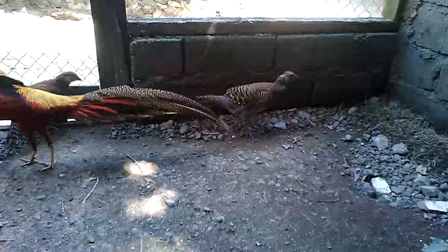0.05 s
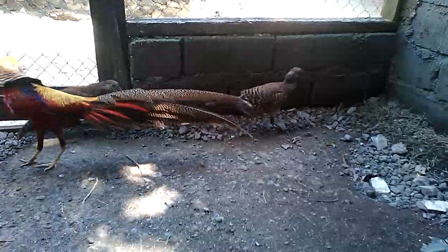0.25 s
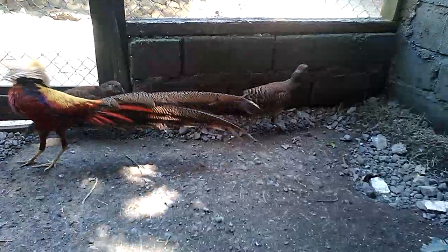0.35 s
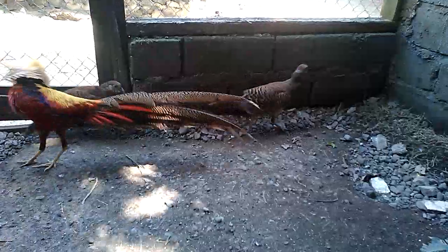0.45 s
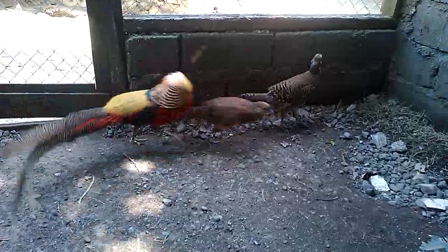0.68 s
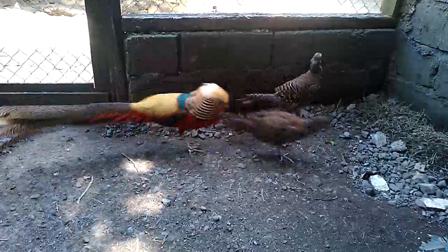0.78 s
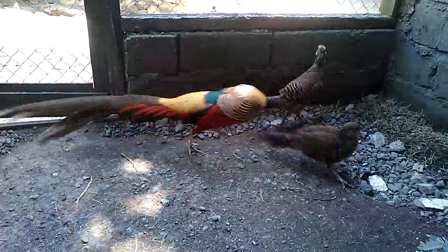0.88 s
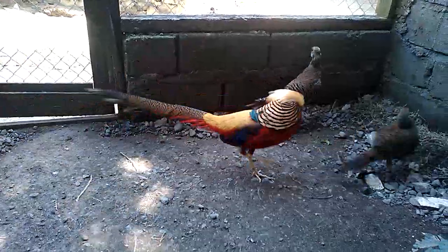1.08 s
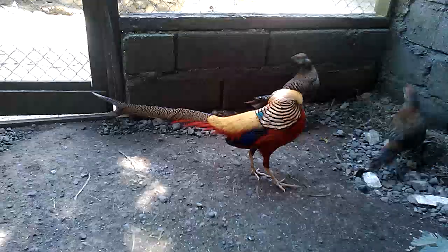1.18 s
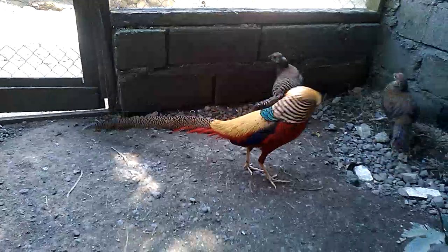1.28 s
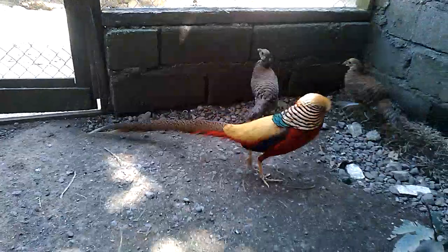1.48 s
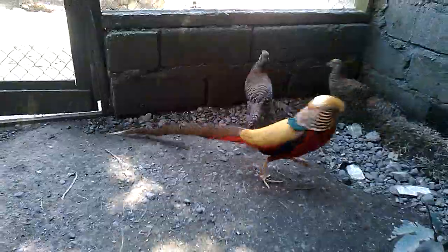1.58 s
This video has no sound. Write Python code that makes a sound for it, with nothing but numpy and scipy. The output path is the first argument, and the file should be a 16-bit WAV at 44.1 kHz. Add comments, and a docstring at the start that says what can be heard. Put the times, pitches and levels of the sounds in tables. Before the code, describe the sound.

A pheasant lets out one long hiss that swells and fades. Feet then scrape over grit and pebbles, and hens give a short falling whine and a few dry clucks, over a faint outdoor hush in a walled pen.

```python
"""A golden pheasant hissing in its pen

The bird gives one long swelling hiss, turbulent air ringing in its throat and beak, then darts over
the grit, its feet scraping, thudding and knocking pebbles together. The hens answer with a falling
whine, soft notes and a few dry clucks, single pulses that ring in the throat. The block walls add
a short dull tail; a steady outdoor hush and a low rumble lie beneath."""
import sys
import numpy as np
from scipy import signal
from scipy.fft import rfft, irfft, next_fast_len
from scipy.io import wavfile
from scipy.ndimage import uniform_filter1d

SR = 44100
rng = np.random.default_rng(int(sys.argv[2]) if len(sys.argv) > 2 else 0)


def log_audio(samples):
    """Write samples as a 16-bit WAV file to the path given in sys.argv[1]."""
    # one column per channel
    frames = np.atleast_2d(samples).T
    # limit to full scale, then quantise
    limited = np.clip(frames, -1, 1)
    pcm = np.round(limited * 32767).astype(np.int16)
    wavfile.write(sys.argv[1], SR, pcm)


N = 72765
TIME = np.arange(N) / SR


def from_db(db):
    """Amplitude ratio of a level in decibels."""
    return 10 ** (np.asarray(db) / 20)


def rms_one(x):
    """Normalisation to unit mean square."""
    return x / np.sqrt(np.mean(x ** 2) + 1e-20)


def in_time(rows):
    """Linear interpolation of each column over the times in the first."""
    times, *columns = np.transpose(rows)
    return [np.interp(TIME, times, column) for column in columns]


def sounding(rows):
    """A gate over the span of a curve, with 5 ms fades."""
    return np.clip(np.minimum(TIME - rows[0][0], rows[-1][0] - TIME) * 200, 0, 1)


def swell(start, attack, hold, release, db=0):
    """A trapezoidal envelope whose plateau lies at the given level."""
    return from_db(db) * np.interp(TIME, np.cumsum([start, attack, hold, release]), [0, 1, 1, 0])


def shaped(x, colour):
    """Zero-phase filtering by a curve of (f/Hz, gain/dB) points."""
    hz, db = np.transpose(colour)
    size = next_fast_len(N + SR // 10)
    f = np.maximum(np.arange(size // 2 + 1) * SR / size, 1)
    gain = from_db(np.interp(np.log(f), np.log(hz), db))
    return irfft(rfft(x, size) * gain, size)[:N]


def noise(colour):
    """Filtered Gaussian noise of unit power."""
    return rms_one(shaped(rng.standard_normal(N), colour))


def drift(hz, order=2):
    """Random fluctuation: low-passed noise of unit power."""
    lowpass = signal.butter(order, hz, fs=SR, output="sos")
    return rms_one(signal.sosfilt(lowpass, rng.standard_normal(2 * N))[N:])


def resonance(hz, width_hz, steadiness=0.19, order=3):
    """A resonance driven by turbulence: narrow-band noise whose envelope steadiness evens out."""
    phase = 2 * np.pi * np.cumsum(hz * np.ones(N)) / SR
    sway = drift(width_hz / 2, order) + 1j * drift(width_hz / 2, order)
    power = uniform_filter1d(np.abs(sway) ** 2, int(4 * SR / width_hz))
    return rms_one(np.real(sway * np.exp(1j * phase)) / (power + 1e-9) ** steadiness)


def ring(pulses, hz, t60):
    """A damped oscillator answers each pulse with a decaying sine."""
    radius, angle = from_db(-60 / (t60 * SR)), 2 * np.pi * hz / SR
    return signal.lfilter([0, np.sin(angle)], [1, -2 * radius * np.cos(angle), radius ** 2], pulses + 1e-18)


def hush(level_db=-64):
    """Stationary broadband noise of the outdoors."""
    # ambient spectrum: f/Hz, gain/dB
    colour = [(25, -7), (110, 2.5), (350, -1.5), (800, -1.5), (1400, -7.5), (2400, -1.5), (3100, -10.5),
              (3900, -15), (4800, -13), (6000, -14.5), (6800, -7.5), (7600, -23.5), (9000, -30.5)]
    return from_db(level_db) * noise(colour)


def rumble(floor_db=-75):
    """Low narrow-band noise, amplitude-modulated by a few soft swells."""
    # Gaussian swells: t/s, width/s, level/dB
    swells = [(.54, 0.13, -73), (.825, 0.052, -67), (1.019, 0.073, -71)]
    rise = sum(from_db(db) * np.exp(-((TIME - t) / width) ** 2) for t, width, db in swells)
    return (from_db(floor_db) + rise) * resonance(hz=62.54, width_hz=23)


def pen(x, t60=0.1353, level_db=-15.5, cutoff_hz=6770):
    """Reverberation: reflections from the block walls arrive after 4 ms and decay exponentially."""
    tail = rng.standard_normal(N) * from_db(-60 * TIME / t60) * (TIME > .004)
    tail = signal.sosfilt(signal.butter(1, cutoff_hz, fs=SR, output="sos"), tail)
    return from_db(level_db) * signal.fftconvolve(x, tail / np.linalg.norm(tail))[:N]


def footwork_and_murmur(attack_s=.0006, grain_db=2.0, grain_hz=700):
    """Impact and friction: feet strike grit, feathers and feet rustle; a hen's murmur adds a low rasp."""
    # foot strikes: t/s, grit level/dB, T60/s, thud level/dB, pebble knock level/dB
    scuffs = [(0.5566, -40, .02, -71, -32), (0.7413, -37, 0.0197, -54, -46),
              (0.744, -40.5, 0.026, -56.5, -53.5), (0.7494, -52, 0.0477, -69.5, -47),
              (0.7642, -42.5, 0.025, -65, -57.5), (0.7678, -50.5, 0.0206, -63.5, -55),
              (1.2287, -50.5, 0.059, -83.5, -63), (1.564, -54, 0.0323, -77.5, -69.5),
              (1.633, -56, 0.038, -67.5, -63)]
    # rustles and low breath noise (the murmur, at 1.299 s):
    # t/s, attack/s, hold/s, release/s, treble level/dB, low level/dB
    rustles_and_breath = [(0.651, 0.027, 0.075, 0.062, -57, -59.5),
                          (0.779, 0.0209, 0.0811, 0.0092, -64.5, -73.5),
                          (1.087, 0.0147, 0.3767, 0.0096, -67.5, -80.5),
                          (1.299, 0.0736, 0.113, .04, -88, -67.5), (1.547, 0.0164, 0.079, 0.113, -68, -75)]
    # spectra of the four noises: f/Hz, gain/dB
    grit_colour = [(600, -22.5), (1500, -15), (2400, 7.5), (3800, -6.5), (5500, 5.5), (6800, 11),
                   (9000, -24.5)]
    low_colour = [(130, -27), (330, -1), (900, 1), (1600, -6), (4000, -34.5)]
    knock_colour = [(1150, -26), (1600, 0.5), (2300, -1.5), (3100, -1.5), (4000, -12), (7000, -29)]
    treble_colour = [(1200, -24.5), (2300, 2.5), (3700, -10.5), (4700, 4.5), (6000, -2), (6750, 11),
                     (7500, -6), (9000, -25.5)]
    grit, low, knock, treble = map(noise, (grit_colour, low_colour, knock_colour, treble_colour))
    out = np.zeros(N)
    for start, grit_db, t60, thud_db, knock_db in scuffs:
        age = np.maximum(TIME - start, 0)
        envelope = np.minimum(age / attack_s, 1) * from_db(-60 * age / t60)
        out += envelope * (from_db(grit_db) * grit + from_db(thud_db) * low + from_db(knock_db) * knock)
    for *shape, treble_db, low_db in rustles_and_breath:
        out += swell(*shape) * (from_db(treble_db) * treble + from_db(low_db) * low)
    return out * rms_one(from_db(grain_db * drift(grain_hz)))


def notes(waver=.015, rough_db=4):
    """Faint glides of two harmonics, randomly modulated in frequency and amplitude."""
    # soft notes, mostly the hens': t/s, length/s, start f/Hz, end f/Hz, level/dB, second harmonic/dB
    glides = [(0.283, 0.0272, 332.9, 331, -63, -30), (0.594, 0.0315, 387.7, 341.8, -61.5, -31.5),
              (0.687, .1, 325.5, 246.2, -63.5, -13.5), (0.82, 0.0522, 406.9, 355.2, -59, -14.5),
              (0.92, 0.0524, 656.3, 1016, -62, -35), (0.996, .042, 425, 381.7, -59, 1),
              (1.249, 0.0955, 830, 769.4, -64, -31.5), (0.304, 0.19, 172, 167.4, -71.5, -11),
              (1.371, 0.0437, 480, 389.4, -67.5, 2.5), (1.31, 0.21, 585, 486, -69.5, -0.5),
              (1.564, 0.0624, 265.4, 274.4, -64.5, -0.5)]
    out = np.zeros(N)
    for start, length, from_hz, to_hz, db, second_db in glides:
        along = np.clip((TIME - start) / length, 0, 1)
        hz = (from_hz + (to_hz - from_hz) * along) * (1 + waver * drift(80))
        phase = 2 * np.pi * np.cumsum(hz) / SR
        envelope = from_db(db + rough_db * drift(110)) * np.sqrt(2 * np.abs(np.sin(np.pi * along)))
        out += envelope * (np.sin(phase) + from_db(second_db) * np.sin(2 * phase))
    return out


def clucks():
    """Impulse response: single pulses excite the damped modes of a hen's throat."""
    # pulses: t/s, level/dB
    onsets = [(1.4561, -33.5), (1.466, -41.5), (1.4785, -42.5), (1.4875, -40.5), (1.6047, -36.5),
              (1.613, -60)]
    # throat modes: f/Hz, gain/dB, T60/s
    modes = [(535.4, -2, 0.0163), (804, 4, 0.00604), (1022, -3.5, 0.0098), (1900, -9, 0.00327)]
    pulses = np.zeros(N)
    for t, db in onsets:
        pulses[int(t * SR)] = from_db(db)
    return sum((-1) ** k * from_db(db) * ring(pulses, hz, t60) for k, (hz, db, t60) in enumerate(modes))


def whine(waver=0.006, rough_db=1.45):
    """A hen's nearly pure tone, with slight jitter and shimmer, grows louder as it sinks."""
    # course of the whine: t/s, f/Hz, level/dB
    contour = [(.948, 1350, -64.5), (.966, 1361, -51.5), (.984, 1328, -55), (1.0, 1247, -49),
               (1.018, 1109, -47), (1.024, 1022, -47), (1.028, 1024, -59.5), (1.04, 950, -65)]
    hz, db = in_time(contour)
    phase = 2 * np.pi * np.cumsum(hz * (1 + waver * drift(120))) / SR
    return np.sqrt(2) * sounding(contour) * from_db(db + rough_db * drift(150)) * np.sin(phase)


def throat():
    """Turbulence excites the low throat formant, with a skirt below it and a squeal above."""
    # strength of the formant: t/s, level/dB
    levels = [(.06, -81.5), (.126, -56), (.208, -57.5), (.292, -46.5), (.425, -44), (.447, -41),
              (.503, -39), (.525, -53.5), (.55, -54), (.566, -47), (.61, -47), (.645, -37), (.654, -50.5),
              (.67, -49), (.694, -65), (.703, -45.5), (.713, -44), (.718, -63.5), (.78, -65.5)]
    # its centre: t/s, f/Hz
    centres = [(.1, 2320), (.43, 2229), (.478, 2368), (.55, 2096), (.64, 2196), (.675, 1945), (.71, 2261)]
    # narrow resonance climbing out of the formant at the height of the hiss: t/s, f/Hz, level/dB
    climb = [(.435, 2503, -55.5), (.452, 2700, -44.5), (.483, 2880, -41), (.502, 2950, -59.5),
             (.535, 3279, -51), (.59, 3014, -55), (.635, 2794, -64)]
    db, = in_time(levels)
    hz, = in_time(centres)
    squeal_hz, squeal_db = in_time(climb)
    formant = resonance(hz, width_hz=507.4, steadiness=0.15)
    skirt = from_db(-11) * resonance(hz=1850, width_hz=456, order=4)
    squeal = sounding(climb) * from_db(squeal_db) * resonance(squeal_hz, width_hz=340, order=4)
    return sounding(levels) * from_db(db) * (formant + skirt) + squeal


def beak(opening, push_db, wander_hz=45.52, wander_rate_hz=25.4):
    """Cavity resonances shift as the beak opens; force tilts their constant total power to the treble."""
    # resonances: nearly shut f/Hz, wide open f/Hz, bandwidth/Hz, nearly shut gain/dB, wide open gain/dB
    modes = [(3286, 3250, 670, -16, -20), (4614, 4600, 597, -9, -18), (5181, 5020, 304, -4.5, -7),
             (5747.4, 5600, 231, -1.5, -3), (6284, 6080, 316, -4.5, 1.5), (6515, 6660, 343, -0.5, 1.5),
             (7026, 7020, 293, 0.5, -1.5), (7463, 7380, 230, -11, -9)]
    tilt_db_per_octave = 0.28 * np.maximum(push_db, -20)
    out, power = 0, 0
    for shut_hz, open_hz, width_hz, shut_db, open_db in modes:
        hz = shut_hz + opening * (open_hz - shut_hz)
        db = shut_db + opening * (open_db - shut_db)
        gain = from_db(db + tilt_db_per_octave * np.log2(hz / modes[0][0]))
        out += gain * resonance(hz + wander_hz * drift(wander_rate_hz), width_hz)
        power += gain ** 2
    return out / np.sqrt(power)


def hiss(air_db=-17, flutter_db=1.08, flutter_hz=106.5, rasp_db=2.3, rasp_hz=434, sag_hz_per_s=3500):
    """Source and filter: fluttering air rings in throat and beak; force makes it brighter and raspier."""
    # force of the hiss, heard in its upper resonances: t/s, level/dB
    force = [(.065, -68), (.135, -55.5), (.212, -48.5), (.416, -45.5), (.434, -39), (.46, -39.5),
             (.49, -34), (.5, -33.5), (.535, -31), (.568, -35.5), (.59, -34.5), (.608, -43), (.682, -47.5),
             (.7, -57), (.73, -56), (.86, -79)]
    # gape of the beak: t/s, opening (0 nearly shut, 1 wide open)
    gape = [(.39, 0), (.47, 0.765), (.53, 1), (.66, 1)]
    # spectra of the rushing air and of the broad burst at the peak: f/Hz, gain/dB
    air_colour = [(1000, -25), (3500, -1.5), (5500, -2), (9000, -4)]
    burst_colour = [(1200, -37), (1600, 5.5), (2500, -1.5), (3600, 6), (4600, 5), (9000, -15.5)]
    # envelopes: t/s, attack/s, hold/s, release/s, level/dB
    whistle_shape = (0.205, 0.025, 0.125, .055, -51.5)  # thin whistle in the build-up
    burst_shape = (.512, 0.028, .06, 0.07, -46.5)  # broad burst at the peak
    release_shape = (.555, .03, .016, .016, -46)  # sagging resonance as the hiss lets go
    force_db, = in_time(force)
    opening, = in_time(gape)
    push_db = force_db - force_db.max()
    flutter = rms_one(from_db(flutter_db * drift(flutter_hz)))
    rasp = from_db(rasp_db * from_db(push_db / 2) * drift(rasp_hz))
    upper = from_db(force_db) * (beak(opening, push_db) + from_db(air_db) * noise(air_colour))
    whistle = swell(*whistle_shape) * resonance(hz=5282, width_hz=136, steadiness=0.12)
    release_hz = 4530 - sag_hz_per_s * (TIME - release_shape[0])
    release = swell(*release_shape) * resonance(release_hz, width_hz=395)
    undertone_db = -57 + 0.331 * push_db - 10.5 * opening
    undertone = from_db(undertone_db) * resonance(hz=1276.3, width_hz=352)
    burst = swell(*burst_shape) * noise(burst_colour)
    breath = sounding(force) * (rasp * upper + undertone)
    return flutter * (breath + throat() + rasp * burst + whistle + release)


def scene():
    """Superposition of the birds' direct sound, its reverberation and the outdoor background."""
    birds = hiss() + whine() + notes() + clucks() + footwork_and_murmur()
    return (birds + pen(birds) + hush() + rumble())[None]


def record(dry, cutoff_hz=9020):
    """Band limiting: a small microphone with a dull top and a steep low-pass cut."""
    # treble response of the microphone: f/Hz, gain/dB
    treble = [(7150, -0.5), (7550, -1.5), (8000, -12.5), (8550, -2.5), (9000, -9.5)]
    lowpass = signal.ellip(12, .3, 80, cutoff_hz, fs=SR, output="sos")
    return signal.sosfilt(lowpass, shaped(dry[0], treble))[None]


dry = scene()
out = record(dry)
log_audio(out)
```